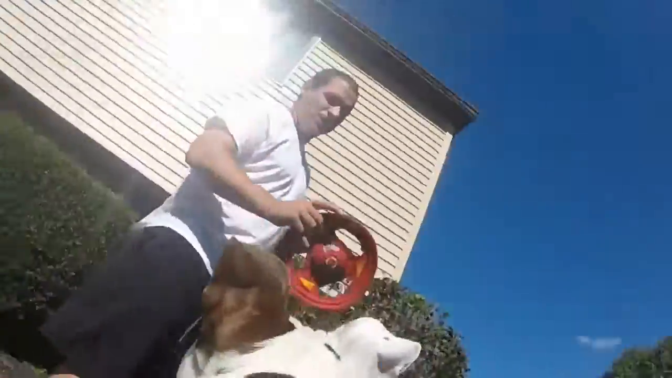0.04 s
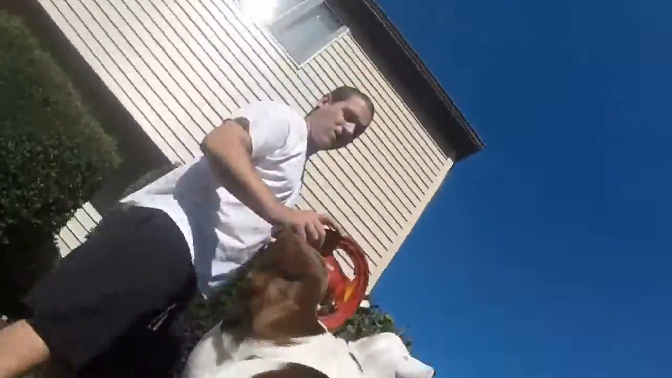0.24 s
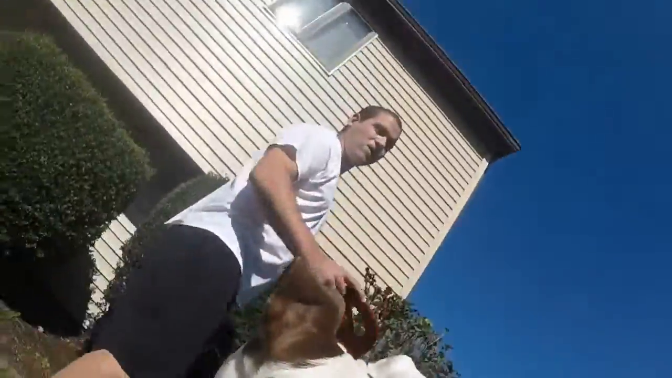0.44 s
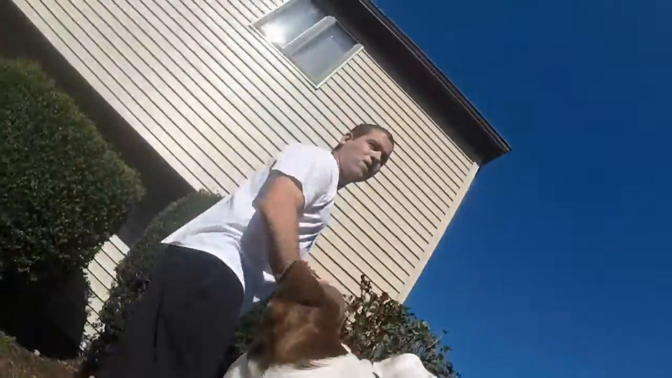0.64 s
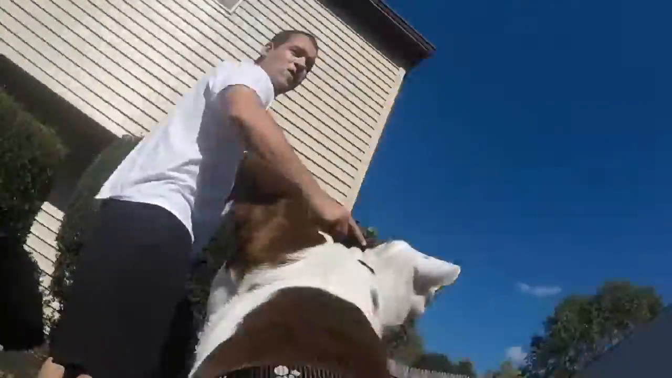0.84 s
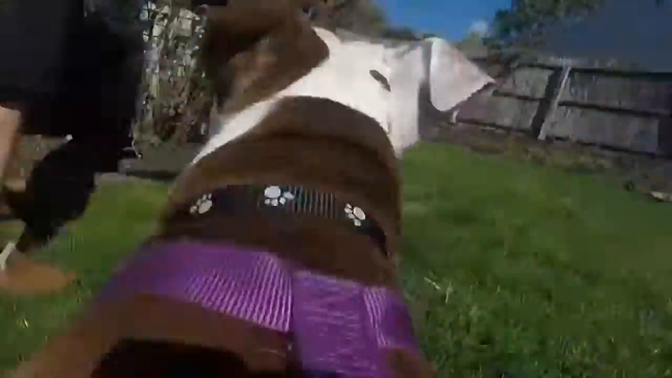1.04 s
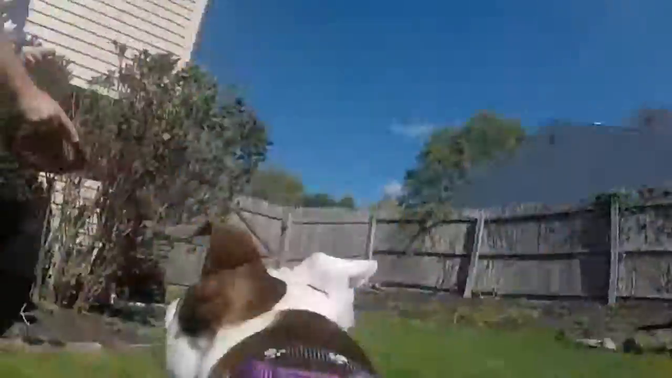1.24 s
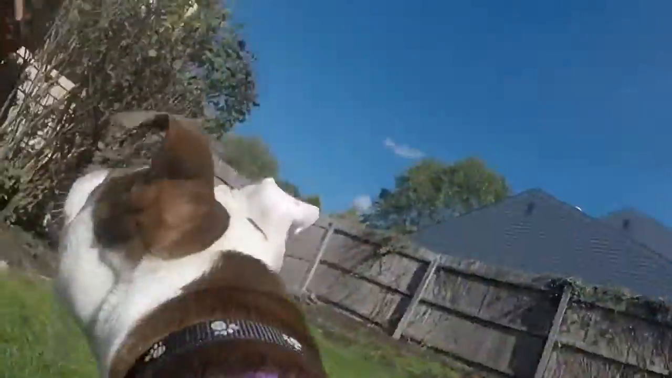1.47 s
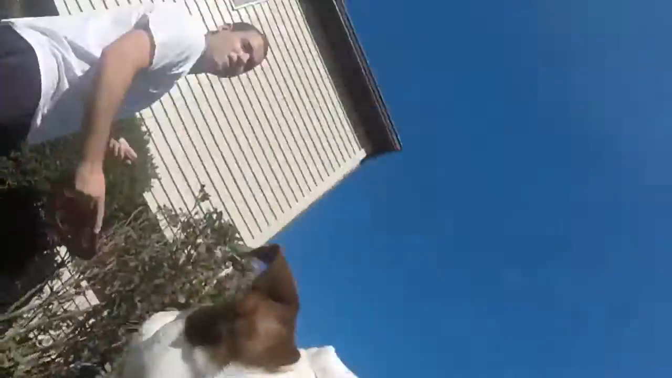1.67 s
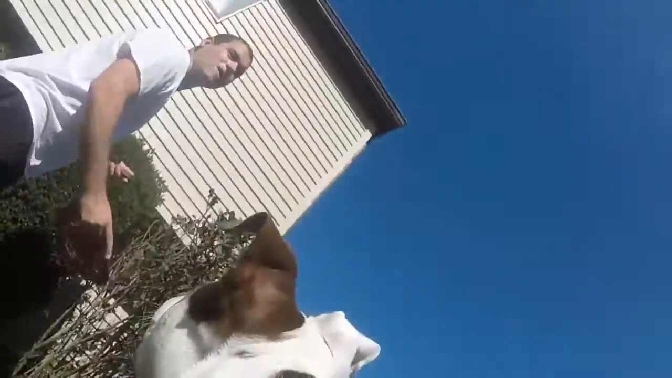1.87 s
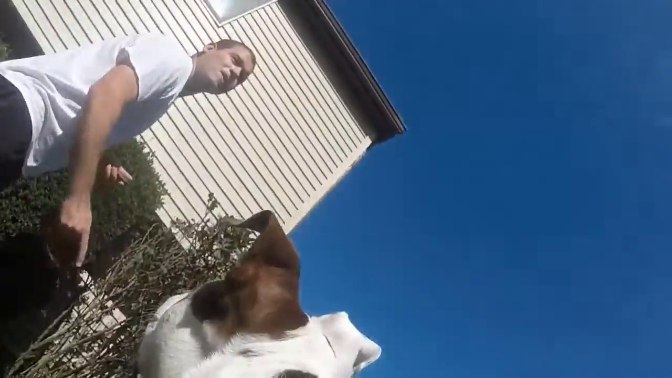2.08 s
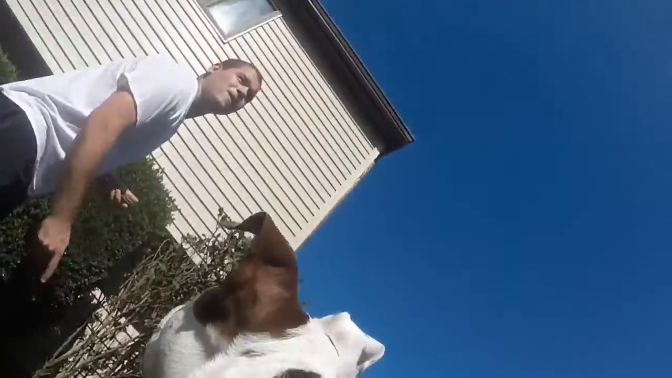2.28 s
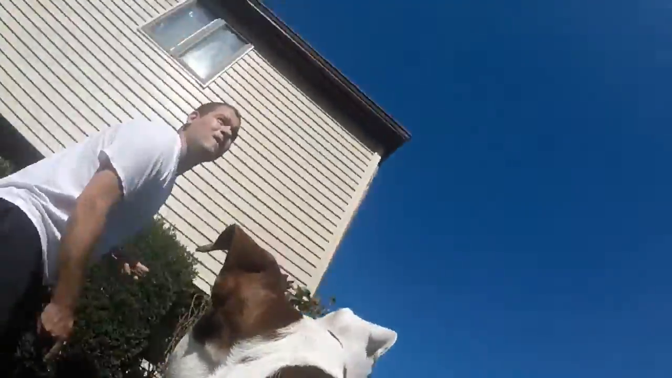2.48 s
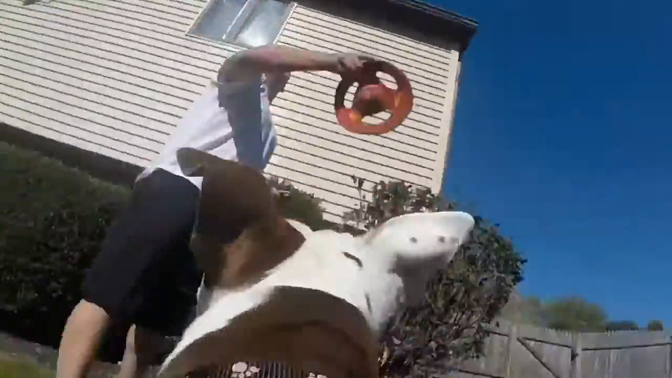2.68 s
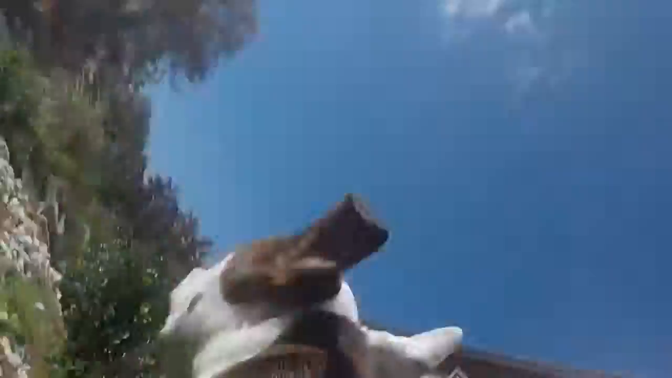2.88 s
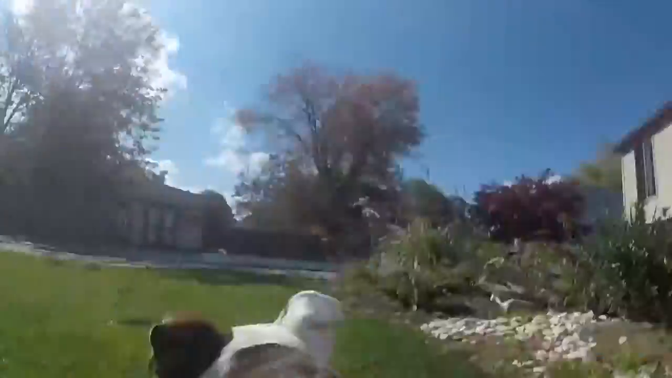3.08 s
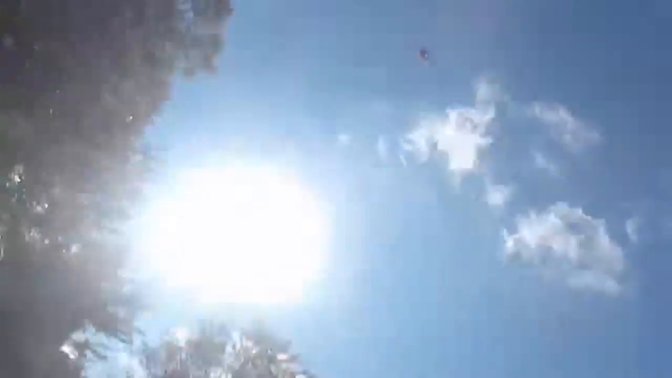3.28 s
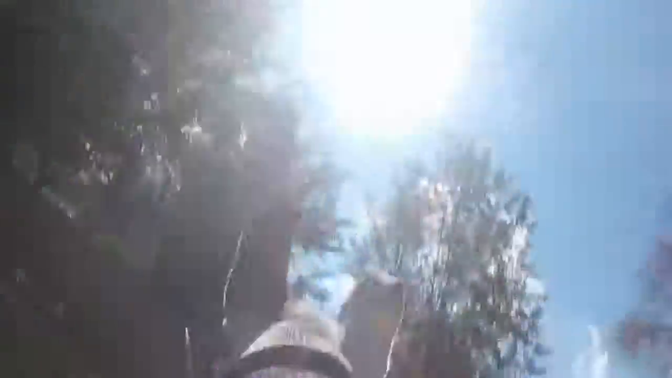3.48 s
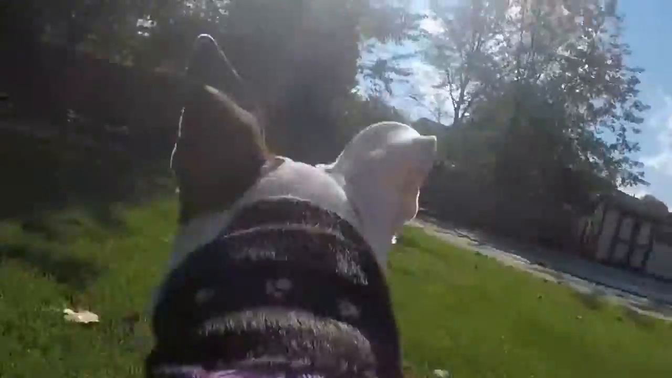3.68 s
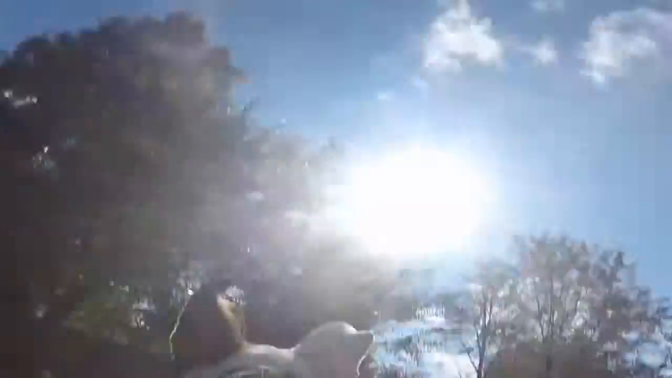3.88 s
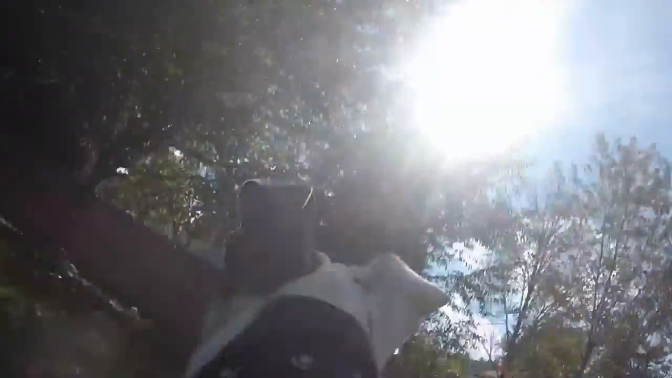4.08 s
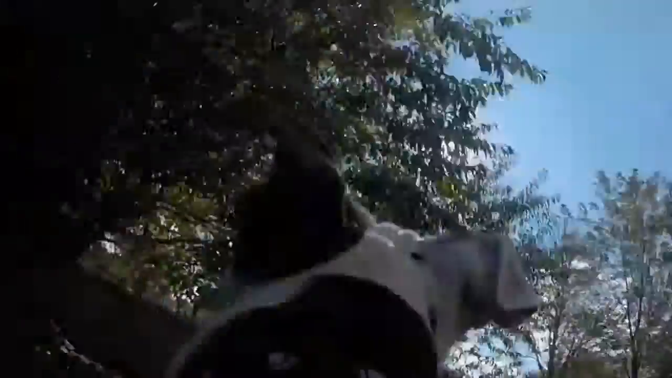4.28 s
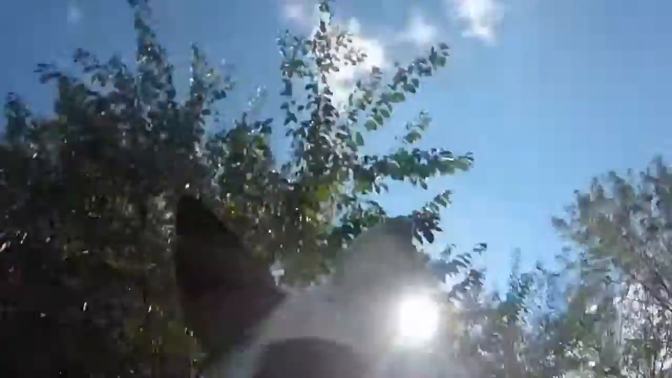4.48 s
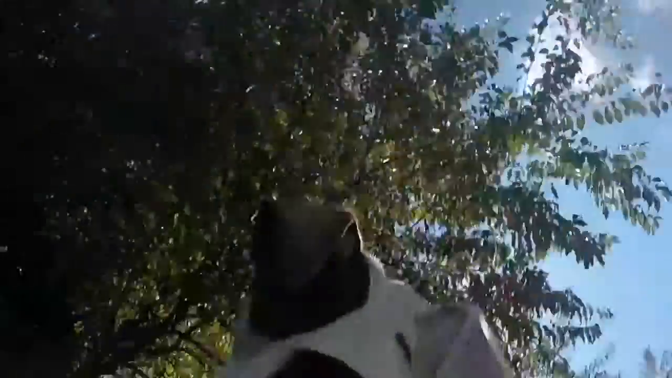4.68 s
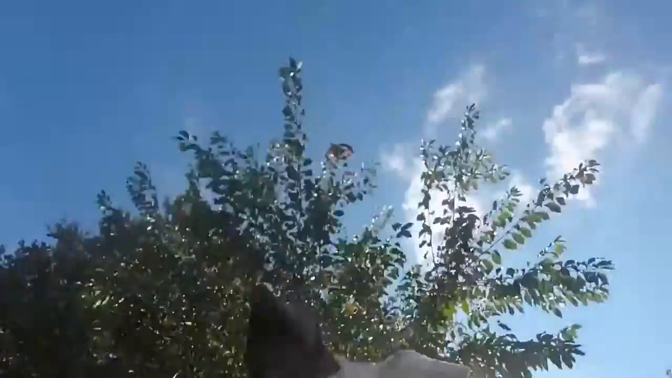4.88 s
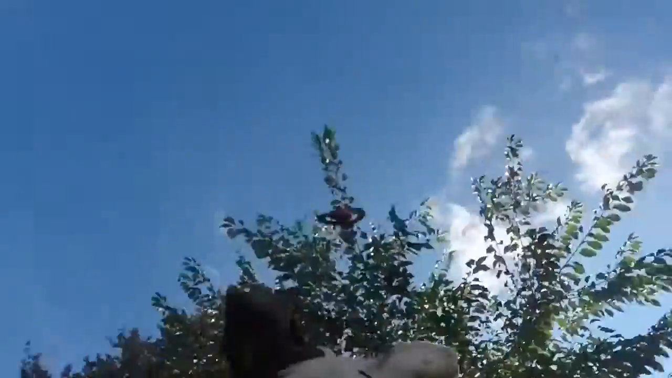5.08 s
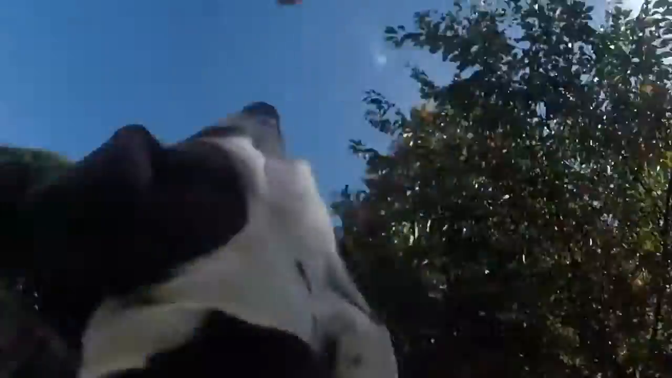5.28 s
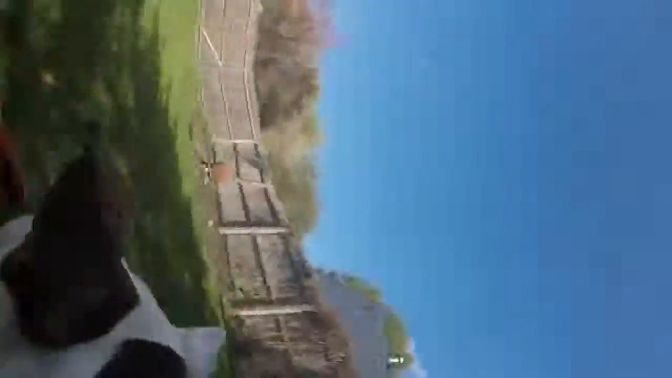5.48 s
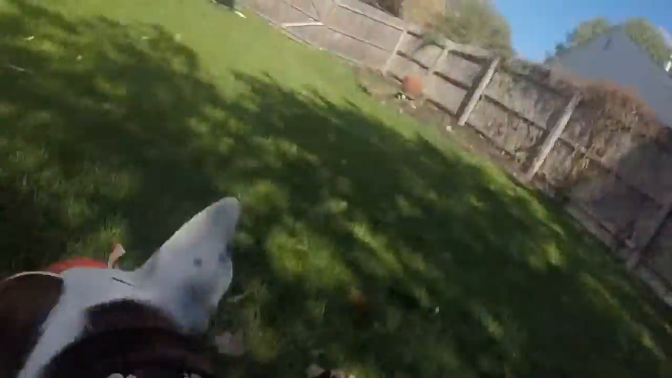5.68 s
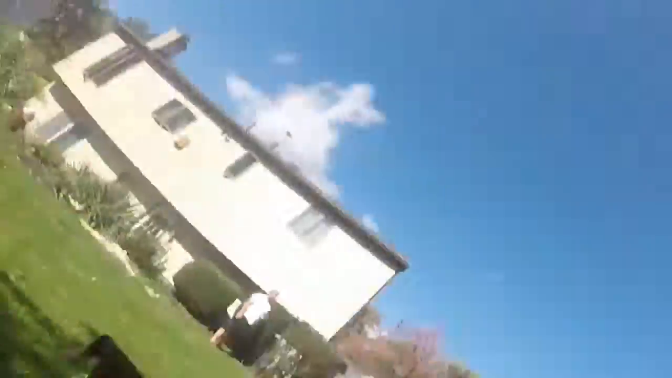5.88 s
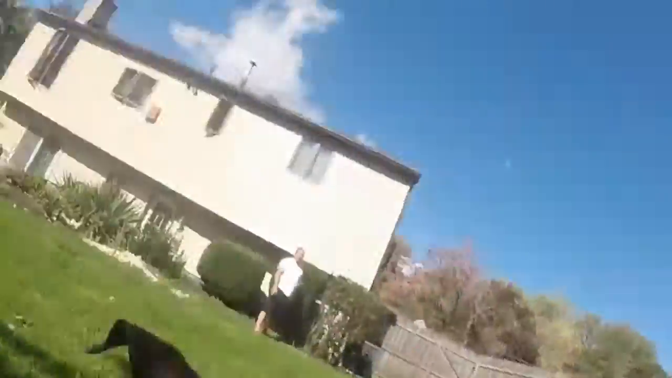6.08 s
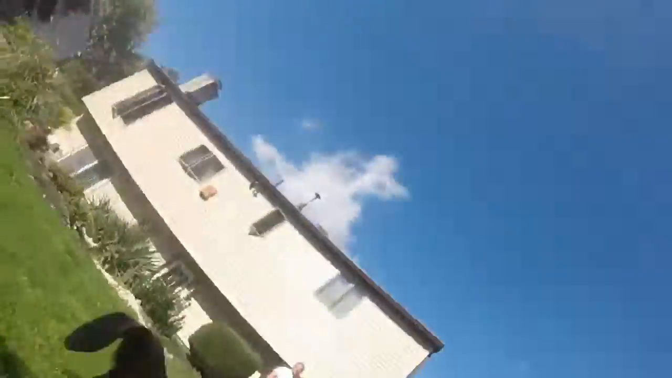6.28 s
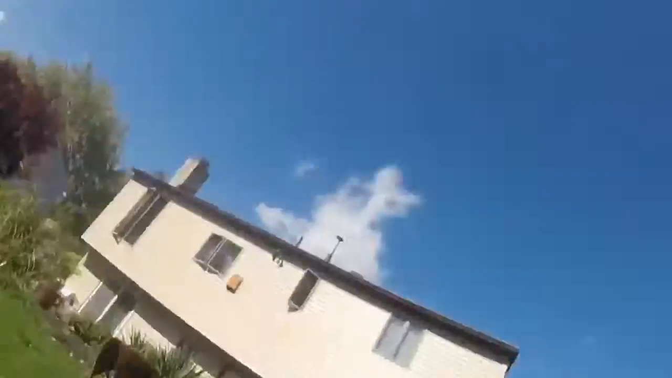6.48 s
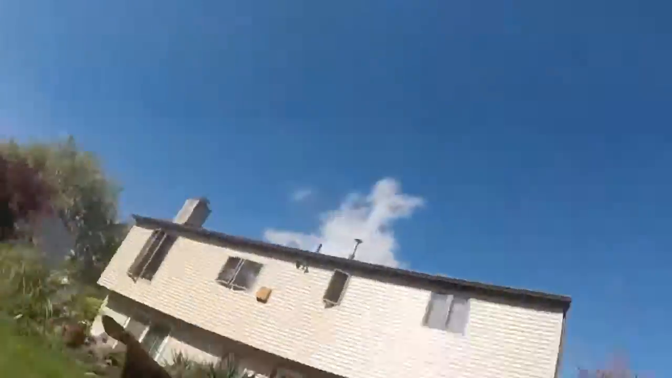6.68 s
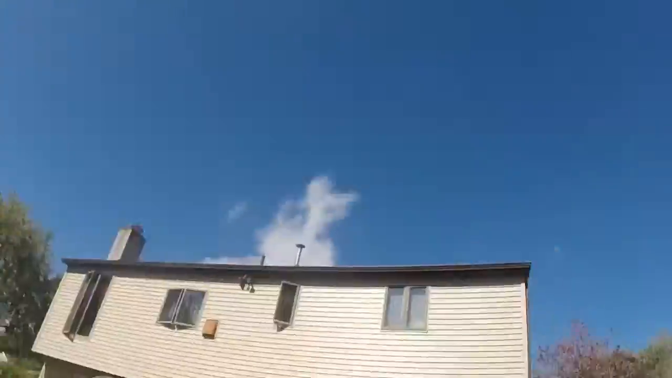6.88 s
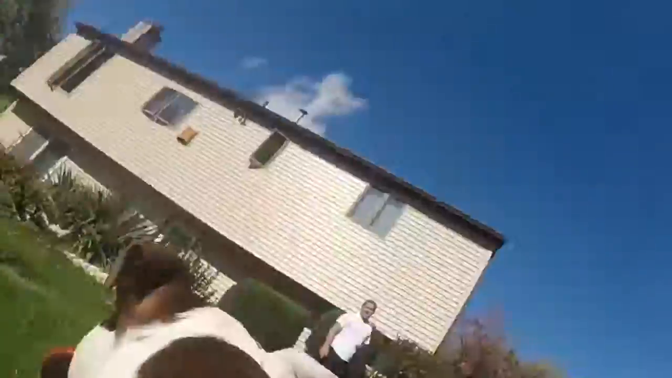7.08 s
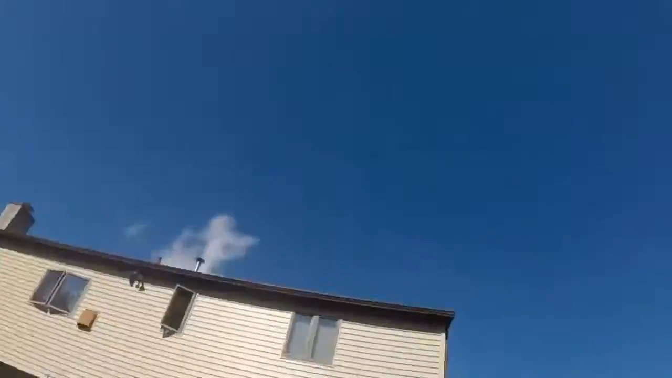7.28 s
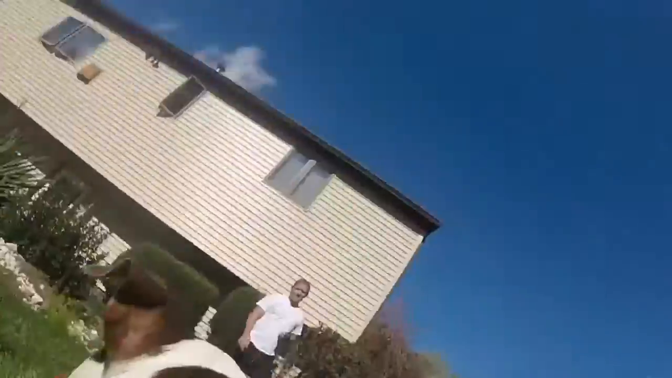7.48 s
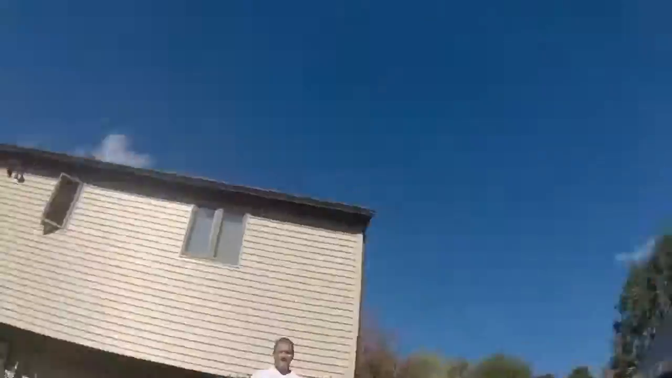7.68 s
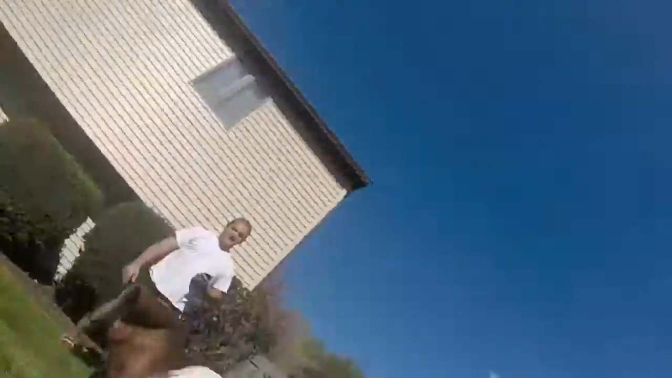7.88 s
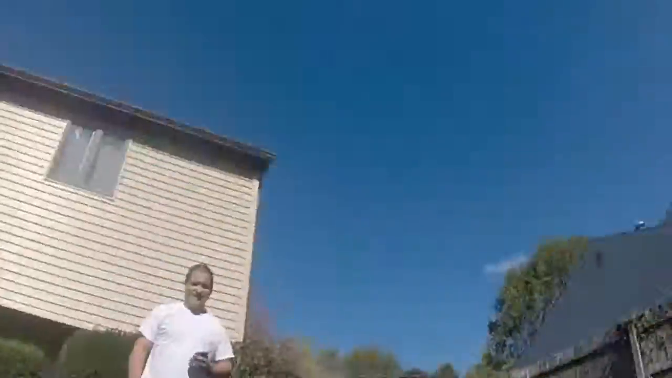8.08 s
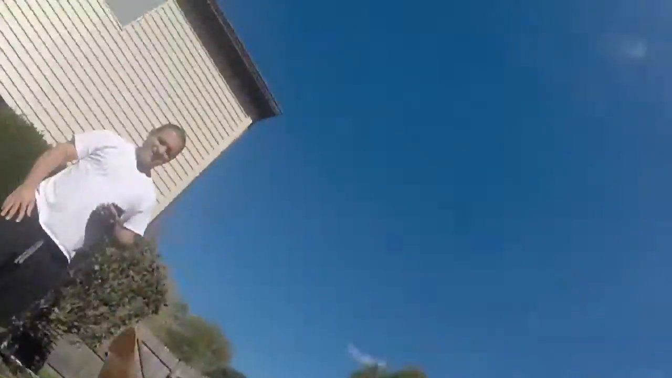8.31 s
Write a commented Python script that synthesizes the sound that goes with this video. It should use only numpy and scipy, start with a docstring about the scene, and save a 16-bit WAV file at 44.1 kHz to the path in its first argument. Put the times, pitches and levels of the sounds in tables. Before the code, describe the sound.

Hard plastic knocks, rattling fittings and jingling collar metal right at the microphone as a dog bolts across a yard, wind gusting low.

```python
"""On a lawn outdoors, heard by the microphone of a camera strapped to a dog's back: nothing but the yard is distant.
The dog waits with a few knocks over wind, a soft murmur, a faint hum and a far insect's trill; then it bolts after
a toy, gusts rise, the loose mount knocks and chatters on the housing, straps rustle and collar metal pings and rings.
It trots back, still knocking. Contacts are noise bursts through housing resonances, metal is decaying sines, air is
shaped noise; the camera's limiter ducks everything after hard knocks."""
import sys
import numpy as np
from scipy import signal
from scipy.fft import rfft, irfft, next_fast_len
from scipy.io import wavfile
from scipy.ndimage import uniform_filter1d, minimum_filter1d

SR = 44100
rng = np.random.default_rng(int(sys.argv[2]) if len(sys.argv) > 2 else 0)


def master(y):
    """Save y as 16-bit WAV."""
    cut = np.clip(np.atleast_2d(y).T, -1, 1)
    pcm = np.round(cut * 32767)  # scale
    wavfile.write(sys.argv[1], SR, pcm.astype(np.int16))


N = 368185
TIME = np.arange(N) / SR
HOLLOW_HZ, MIDDLE_HZ, BRIGHT_HZ = 1450, 3000, 6600  # upper edges of the lower three registers


def undb(db):
    """Decibels to gain."""
    return 10 ** (np.asarray(db) / 20)


def unit(x):
    """Scale to rms 1."""
    return x / (np.sqrt(np.mean(x ** 2)) + 1e-12)


def add(out, s, x):
    """Mix x into out from time s on."""
    i = max(int(s * SR), 0)
    out[i:i + len(x)] += x[:max(N - i, 0)]


def follow(points):
    """Level [dB] over time, in straight lines between (time, level) points."""
    return np.interp(TIME, *np.transpose(points))


def band(x, hz, kind, order=3):
    """Causal Butterworth filter."""
    return signal.sosfilt(signal.butter(order, hz, kind, fs=SR, output="sos"), x)


def resonate(x, hz, width_hz):
    """One resonance of the given bandwidth."""
    return signal.lfilter(*signal.iirpeak(hz, hz / width_hz, fs=SR), x)


def walk(rate):
    """Smooth random wander with a spread near 1, taking a new value `rate` times a second."""
    steps = rng.standard_normal(N // 100)
    return 1.2 * np.interp(TIME * rate, np.arange(len(steps)), steps)


def coloured(points):
    """Noise of rms 1 with a spectrum of (Hz, dB) points."""
    hz, db = np.transpose(points)
    size = next_fast_len(N, real=True)
    f = np.maximum(np.fft.rfftfreq(size, 1 / SR), 1)
    spectrum = rfft(rng.standard_normal(size)) * undb(np.interp(np.log(f), np.log(hz), db))
    return unit(irfft(spectrum, size)[:N])


def mode(hz, t60):
    """One struck mode: a decaying sine that starts at rms 1."""
    t = TIME[:int(t60 * SR)]
    return np.sqrt(2) * np.sin(2 * np.pi * hz * t) * np.exp(-np.log(1000) * t / t60)


def grains(spread_db, count):
    """Random tiny contacts, most weak and a few strong."""
    out = np.zeros(N)
    size = undb(spread_db * np.minimum(rng.exponential(size=count), 3))
    out[rng.integers(0, N, count)] = size * rng.choice([-1, 1], count)
    return out


def registers(x):
    """Split into hollow, middle, bright and tick bands."""
    hollow = band(x, HOLLOW_HZ, "low", order=5)
    middle = band(x, [HOLLOW_HZ, MIDDLE_HZ], "band", order=4)
    bright = band(x, [MIDDLE_HZ, BRIGHT_HZ], "band", order=4)
    tick = band(x, BRIGHT_HZ, "high", order=8)
    return [hollow, middle, bright, tick]


# Resonances of the plastic camera housing: (frequency [Hz], width [Hz], level [dB])
HOUSING_MODES = [(800, 33, 0), (955, 120, 7), (1164, 217, 5), (2063, 310, 4.5), (2306, 57, -0.5),
                 (2566, 190, -2), (3335, 264, -3), (3707, 310, -9.5), (4345, 254, -1.5), (5290, 830, -10),
                 (6280, 320, -2), (9070, 530, -14.5), (10060, 370, -14.5), (14100, 1000, -11.5)]


def housing(force, vary_db=0, lowest_hz=560, highest_hz=11400):
    """The case rings in short modes, each as strongly as the contact point allows; it is too small to give bass."""
    out = 0
    for hz, width_hz, db in HOUSING_MODES:
        place = undb(db + vary_db * rng.standard_normal(force.shape[:-1] + (1,)))
        out = out + place * resonate(force, hz, width_hz)
    return band(band(out, lowest_hz, "high", order=3), highest_hz, "low", order=6)


def roaming(force, roam_db, shift_rate_hz=70, lowest_hz=590, highest_hz=11000):
    """Small contacts land all over the case, so each one favours other modes and has its own colour."""
    out = 0
    for hz, width_hz, db in HOUSING_MODES:
        place = undb(db + roam_db * np.clip(walk(shift_rate_hz), -2, 2))
        out = out + resonate(force * place, hz, width_hz)
    return band(band(out, lowest_hz, "high", order=3), highest_hz, "low", order=4)


# Knocks of the mount, right at the microphone: (time [s], level [dB],
# hollowness of the lows against the middle [dB], hardness of the treble against the middle [dB])
KNOCKS = [(0.2838,-40,4,3),(.9989,-31,2,-1),(1.0841,-23,8.5,13),(1.1216,-29.5,0,-10),(1.148,-14,-0.5,11),(1.1558,-8,-8,8.5),(1.2698,-27.5,3.5,-3),(1.2826,-17.5,-2,2.5),(1.3003,0.5,-5,13.5),(1.371,-33,-3,2),(1.429,-18.5,-3,5),(1.453,-7.5,-2.5,23),(1.462,-17.5,0.5,21),(1.5926,-34,-9,17),(1.7118,-25.5,-2,-2.5),(1.7669,-16.5,3,19.5),(1.828,-42.5,-14,-8.5),
          (2.697,-28.5,7,7.5),(2.711,-18.5,-3,-2.5),(2.7616,-2.5,-6.5,6),(2.779,-2,-7,9.5),(2.817,-14.5,-4,14),(2.998,-12.5,5,13),(3.0186,-16.5,-3,24),(3.0846,-2,-13.5,-3),(3.1945,-11.5,-4.5,-3),(3.2163,-6.5,-9,-3.5),(3.2344,-18,15,1),(3.3053,-14.5,4,-13),(3.3238,-7.5,-22,-6),(3.3302,-14.5,10,2),(3.343,-12.5,-1,1),(3.3676,-5.5,3.5,8),(3.4389,-2.5,-36,-21),(3.4699,-5.5,-8,6.5),(3.4787,-8,-18,4),(3.503,2,-24,6),(3.5172,-1,-11.5,-4.5),(3.576,1.5,0,13),(3.6061,-12,-4,6),(3.685,-15,-4.5,-7.5),
          (3.8059,-7.5,-5,5),(3.848,-6,-5.5,7.5),(3.8536,-9,-16,8),(3.8761,-3.5,-9.5,2.5),(3.916,-5,-6.5,-5),(3.9417,6.5,-9,3.5),(3.9503,3.5,7.5,9),(3.961,3.5,-7,4),(4.0262,-16,10,-4),(4.0738,1,-10,10),(4.0837,9.5,-2,0.5),(4.09,8.5,-16,2.5),(4.155,-1.5,-9,0),(4.1836,-13,-3,9),(4.256,1.5,11.5,10),(4.2611,4.5,9.5,9.5),(4.288,9,2.5,10.5),(4.2979,-2.5,1,-3),(4.3065,-5.5,2,4),(4.3824,-8.5,7,-3.5),(4.442,-11,-6,12),(4.4827,-7.5,-12,11),(4.581,-14.5,-18,-14),(4.5973,6.5,3.5,-10.5),(4.6244,-7.5,0,-2),(4.6644,-10.5,-11,-6),(4.776,-2.5,-2,4.5),(4.879,-17.5,13,5),
          (5.229,-20,10.5,11),(5.2897,-9,8,6.5),(5.322,-15,-2,-2),(5.4001,-9.5,-2.5,-3.5),(5.419,-14,-7,-6),(5.438,-12,0.5,3.5),(5.512,-20,8,12.5),(5.5455,-8,0,0),(5.5977,-14.5,11,6.5),(5.6505,-17.5,-6,4),(5.7213,-17.5,-14,0),(5.747,-19,-5,-11),(5.7551,-6.5,-21,-2.5),(5.7962,1.5,9,18),(5.8979,5.5,2.5,24),(5.9231,-6,1.5,1),(5.9342,-11.5,-8,14),(6.092,-17,2.5,11),(6.2219,-8.5,-21,2.5),(6.284,-1.5,-7.5,-0.5),(6.3238,-19,16,8),(6.361,5,-10,-4.5),(6.557,-19,-8.5,5),(6.5703,-20,17,13.5),(6.7392,-14,-1,0.5),(6.839,-12,25,6),(6.879,-10.5,4,-1),(6.9178,-24,14,-2),(6.9861,-19.5,6,1),(7.025,-22,1,-14),
          (7.0722,-6,-0.5,-7),(7.0977,-7,-1.5,7.5),(7.2715,-16.5,10,2),(7.2903,-2.5,-11,14),(7.306,-5.5,1.5,14),(7.3215,-9,-9,12),(7.408,5,9.5,12),(7.4293,-8.5,18,1),(7.4439,-7,5,9),(7.5224,2.5,4.5,18.5),(7.5809,-12.5,-1.5,-2),(7.6806,-5,-3.5,13),(7.8637,-11.5,13,-3),(7.945,-12.5,-14,4),(8.0664,-19,4,2),(8.1082,-22,15,-1),(8.1385,-7.5,0,7.5),(8.1701,-4,1,3),(8.1917,-6.5,-6,10),(8.252,-6.5,-14,-5),(8.305,-22,13,4),(8.3378,-24,-7,1)]


def knocks(snap=1.0, buzz_s=0.0016, tail_db=-29, tail_s=0.0082, clack_hz=3730, clack_width_hz=260, clack_db=-7,
           tick_under_db=-7, tick_share=0.77):
    """Each knock is a hard contact and a brief buzz of tiny rebounds; where it lands sets its colour."""
    t = TIME[:SR // 25]
    rebounds = np.exp(-(t / buzz_s) ** 0.79) + undb(tail_db) * np.exp(-t / tail_s)
    force = rng.standard_normal((len(KNOCKS), len(t))) * rebounds
    force[:, 0] += snap
    parts = np.stack(registers(housing(force, vary_db=4.0)), axis=1)
    # the harder the knock, the more one stiff mode of the case carries it: a sharp clack
    clack = resonate(parts[:, 2], clack_hz, clack_width_hz)
    parts[:, 2] += undb(np.array(KNOCKS)[:, 3:4] + clack_db) * clack
    # levels are those of the first 5 ms
    parts /= np.sqrt(np.mean(parts[:, :, :SR // 200] ** 2, axis=2, keepdims=True))
    out = np.zeros(N)
    for (s, db, hollow, hard), part in zip(KNOCKS, parts):
        # the topmost tick lies lower and follows only a share of the hardness
        weights = undb([hollow, 0, hard, tick_share * hard + tick_under_db])
        add(out, s, undb(db) * weights @ part / np.linalg.norm(weights))
    return out


# Spells of fine chatter at the mount, levels before each layer's own gain:
# (time [s], length [s], level [dB], shimmer of the small ring [dB])
RATTLES = [(0.065,.12,-42.5,-70),(0.933,0.11,-32,-66),(1.096,0.079,-30.5,-68),(1.422,0.04,-25.5,-69.5),(1.57,0.04,-41.5,-75),(1.682,.043,-33.5,-72.5),(2.606,0.055,-45.5,-72),(2.698,0.044,-31.5,-66),(2.758,0.08,-22.5,-60),(2.985,0.046,-19.5,-59),(3.187,0.073,-18,-36),(3.292,0.099,-15,-36),(3.462,0.044,-20,-48),(3.686,.094,-37,-42),(3.804,0.22,-26,-64),(4.074,0.049,-13.5,-21),(4.193,0.026,-21,-36),(4.266,0.053,-8.5,-49),(4.383,0.11,-27,-51),(4.594,0.041,-8.5,-57),(4.88,0.043,-15.5,-38),(4.951,0.077,-15.5,-26),(5.12,0.14,-53,-43),(5.273,0.19,-23,-44.5),(5.507,0.2,-28,-49),(5.71,0.071,-20,-54),(5.901,0.055,-15,-42),(6.12,0.032,-19,-46.5),(6.2,0.025,-17.5,-50),(6.276,0.067,-25.5,-38),(6.544,0.041,-29,-49),(6.734,.042,-19,-43),(6.843,0.13,-27.5,-26),(7.07,0.073,-19.5,-27),(7.212,0.093,-39.5,-43),(7.28,0.058,-15.5,-40),(7.407,0.058,-15,-45),(7.478,0.06,-18.5,-57),(7.668,0.028,-15,-39),(7.696,0.081,-25.5,-62),(7.846,0.12,-16,-51),(8.03,0.093,-32.5,-64),(8.162,0.043,-15,-46),(8.313,.04,-26.5,-54)]


def spells(gains, release_s=0.0039):
    """Envelope that holds one gain through each spell of chatter and dies away after it."""
    out = np.zeros(N)
    for (s, length, *_), gain in zip(RATTLES, gains):
        add(out, s, np.full(int(length * SR), gain))
    keep = np.exp(-1 / (release_s * SR))
    return signal.lfilter([1 - keep], [1, -keep], out)


def chatter(gain_db=-3.5, hollow_db=-3, bright_db=-2, tick_db=-14, surge_db=3):
    """Sliding parts catch and slip many times in uneven surges, rattling the housing."""
    contacts = roaming(grains(2.85, count=7000), roam_db=4.5)
    low, middle, bright, tick = (unit(x) for x in registers(contacts))
    body = unit(middle + undb(bright_db) * bright)
    rattle = unit(undb(hollow_db) * low + body + undb(tick_db) * tick)
    return rattle * spells(undb(np.array(RATTLES)[:, 2] + gain_db)) * undb(surge_db * walk(90))


# Clear blows on the small metal ring close by, before gain: (time [s], level [dB], brightness [dB])
PINGS = [(3.198,-22,-12),(3.223,-26,-8),(3.254,-34,4),(3.35,-16,2.5),(3.393,-22,-9.5),(3.414,-34,10),(3.439,-27.5,-1),(3.502,-14,-37),(3.723,-30,-20),(4.028,-26.5,-12),(4.201,-48,17),(4.425,-46,11),(4.623,-10.5,-8),(4.648,-15.5,-26),(4.857,-28.5,-13),(4.897,-21.5,-4),(4.963,-23,-3),(4.995,-2,-17),(5.014,-14.5,-12),(5.038,-27,-22),(5.177,-33,-10),(5.289,-31,-4),(5.362,-27,11.5),(5.412,-24,-3),(5.437,-13,-7.5),(5.519,-26.5,-7),(5.567,-26,-15),(5.595,-28.5,3),(5.652,-24.5,-5.5),(6.29,-28.5,-8),(6.765,-20,-4),(6.758,-15.5,-7.5),(6.851,-20,-31),(6.88,-13,-7),(6.94,-25,3),(7.004,-30,-18),(7.044,-32,-22),(7.099,-15.5,-5.5),(7.145,-26,-20),(7.271,-22,-14),(7.522,-1.5,-17),(7.679,-27.5,1),(7.867,-21.5,-8),(7.946,-9.5,-9)]
# Modes of the free ring: (frequency [Hz], level [dB], t60 [s], index of the group whose strength it shares)
RING_MODES = [(5060, 0, .14, 0), (5700, -4, .11, 0), (6325, -5, .055, 1), (6400, -5, .045, 1),
              (7878, -2, .13, 2), (11240, -2, .11, 3), (12642, -1, .1, 4), (12690, -5, .07, 4),
              (13610, -1, .07, 4), (15240, -5, .08, 4)]
# How a blow reaches the mode groups near 5, 6.4, 7.9, 11.2 and 13 kHz:
# (level [dB], share of the brightness that it follows)
RING_GROUPS = [(-17.5, 1), (1, 0.0048), (-9, 0.35), (0.5, 1), (-7, 1)]


def small_ring(gain_db=5.0, vary_db=2.5, detune=.0022, grip=0.079, clink_db=-3, clink_t60=0.054, clink_spread=0.04):
    """The ring sounds a different mix of its modes at each blow; the strap damps it, now tighter, now looser."""
    out = np.zeros(N)
    chance = rng.standard_normal((len(PINGS), len(RING_MODES), 4))
    for (s, level_db, bright_db), draws in zip(PINGS, chance):
        for k, ((hz, db, t60, group), (bend, slack, load, place)) in enumerate(zip(RING_MODES, draws)):
            group_db, share = RING_GROUPS[group]
            blow_db = level_db + group_db + share * bright_db
            gain = (-1) ** k * undb(blow_db + vary_db * place + db + gain_db)
            add(out, s, gain * mode(hz * (1 + detune * bend), t60 * np.exp(grip * slack)))
            # while the two metal parts still touch, the mode is pulled off pitch and dies quickly
            add(out, s, gain * undb(clink_db) * mode(hz * (1 + clink_spread * load), clink_t60))
    return out


# The small ring swings freely from the leap until the dog slows down: (start [s], end [s])
JINGLE_S = (3.18, 8)


def shimmer(gain_db=-8, low_modes_db=-5, swing_db=-30, scrape_db=-7, scrape_hz=8000, pressed=.5):
    """Chatter and the swing of the run tap the ring, mostly its high modes; pressed on its clasp it rings shorter."""
    swinging = (TIME > JINGLE_S[0]) & (TIME < JINGLE_S[1])
    effort = spells(undb(np.array(RATTLES)[:, 3] + gain_db))
    effort = effort + swinging * undb(follow(RUSTLE) + swing_db)
    # metal sliding on metal adds a fine, very high crackle
    scrape = unit(band(grains(6, count=2500), scrape_hz, "high", order=2))
    out = undb(scrape_db) * effort * scrape
    for hz, db, t60, _ in RING_MODES:
        ring = mode(hz, t60 * pressed)  # the share of its free ring time that it keeps
        gain = undb(db + low_modes_db * (hz < BRIGHT_HZ)) / np.linalg.norm(ring)
        taps = unit(grains(5.4, count=1000)) * effort
        out += gain * signal.oaconvolve(taps, ring)[:N]
    return out


# Blows that leave the heavy buckle ringing close by, before gain: (time [s], level [dB])
BUCKLE = [(1.1548, -34.5), (1.3004, -36.5), (3.0846, -36), (3.5017, -16.5), (3.9612, -25.5), (4.091, -14.5),
          (4.289, -12.5), (4.5983, -12), (4.777, -29.5), (5.7966, -29), (6.3613, -18.5), (7.0712, -31),
          (7.4096, -23), (8.1925, -34), (8.2524, -32.5)]
# Modes of the buckle: (frequency [Hz], level [dB], t60 [s])
BUCKLE_MODES = [(712, -3, 0.087), (1810, -1.5, 0.3), (2900, -6.5, 0.15), (5000, -20.5, .05)]


def buckle(gain_db=1.0, choke_s=0.018):
    """The heavier metal rings on after hard knocks, until the next such blow stops it."""
    out = np.zeros(N)
    ends = [s for s, _ in BUCKLE[1:]] + [N / SR]
    for (s, level_db), end in zip(BUCKLE, ends):
        for hz, db, t60 in BUCKLE_MODES:
            ring = mode(hz, t60)
            free = np.exp(-np.maximum(s + TIME[:len(ring)] - end, 0) / choke_s)
            add(out, s, undb(level_db + db + gain_db) * ring * free)
    return out


# Dull bumps of the camera on the dog's back, before gain: (time [s], level [dB])
BUMPS = [(3.327, -18.5), (3.935, -13.5), (4.073, -12), (4.082, 6), (4.289, -8.5), (5.458, -24),
         (7.522, -14)]


def bumps(top_hz=170, decay_s=0.0089, gain_db=-1):
    """Soft contact with the body passes mostly the bass."""
    out, t = np.zeros(N), TIME[:SR // 10]
    for s, db in BUMPS:
        thud = unit(band(rng.standard_normal(len(t)), [55, top_hz], "band", order=1))
        add(out, s, undb(db + gain_db) * thud * np.exp(-t / decay_s))
    return out


# Rubbing of the straps beside the camera as the dog moves, before each layer's gain: (time [s], level [dB])
RUSTLE = [(0.1, -49), (0.5, -52), (0.8, -54), (1.05, -42.5), (1.55, -46.5), (1.95, -68), (2.5, -58),
          (2.85, -33), (3.3, -27.5), (3.65, -33), (4.3, -28.5), (4.7, -26.5), (5.1, -36), (5.55, -37.5),
          (6.1, -35), (6.55, -44.5), (7.2, -32), (8.25, -41)]


def straps(tick_db=-2, rub_db=-4, flutter_db=4, still_db=-62, muffled_db=-12, muffled_hz=380, slack_db=-6,
           pull_s=0.091):
    """Webbing rubs on fur, dull through the case, and fittings tick; it pulls around chatter, slack between."""
    pulled = np.clip(2 * uniform_filter1d(spells(np.ones(len(RATTLES))), int(pull_s * SR)), 0, 1)
    rustle = np.maximum(undb(follow(RUSTLE)) - undb(still_db), 0)  # silent when nearly still
    ticks = unit(roaming(grains(8, count=700), roam_db=6.5)) * undb(tick_db)
    rub = unit(roaming(grains(2.5, count=9000), roam_db=3.5)) * undb(rub_db + flutter_db * walk(35))
    muffled = unit(band(rng.standard_normal(N), [muffled_hz / 1.28, muffled_hz * 1.57], "band", order=2))
    muffled = muffled * undb(muffled_db + 4.5 * walk(25))
    return rustle * undb(slack_db * (1 - pulled)) * (ticks + rub + muffled)


# Spectrum of the wind on the case: (frequency [Hz], relative level [dB per Hz])
WIND = [(20, -1.5), (35, -1.5), (60, -1.5), (100, -5.5), (150, -12), (220, -16), (400, -54), (900, -85.5)]
# Wind on the case, strongest as the dog bolts, before gain: (time [s], level [dB])
GUSTS = [(0, -45), (0.8, -41), (1.15, -39.5), (1.5, -52.5), (2.2, -46), (2.65, -44.5), (2.9, -27),
         (3.3, -28), (3.55, -42.5), (3.73, -25.5), (3.98, -39), (4.35, -33), (4.65, -41.5), (5.15, -44.5),
         (5.5, -39), (6, -48), (6.6, -44.5), (7.25, -37.5), (8.3, -42.5)]


def wind(gain_db=-1, gust_db=2):
    """Air buffets the case: low rumbling noise that rises and falls in gusts."""
    return coloured(WIND) * undb(follow(GUSTS) + gain_db + gust_db * walk(14))


# Spectrum of the open yard all around: (frequency [Hz], relative level [dB per Hz])
YARD = [(60, 2.5), (120, -2.5), (200, 0.5), (290, -3), (400, -3), (600, -6), (900, -0.5), (1150, -5.5),
        (1500, -18.5), (2200, -23), (5000, -30), (7500, -34), (14000, -47.5)]


def yard(level_db=-44.5, swell_db=2.1):
    """The outdoor murmur is shaped noise that swells a little around one level."""
    return coloured(YARD) * undb(level_db + swell_db * walk(8.5))


# Partials of a faint hum in the background: (frequency [Hz], level [dB])
HUM = [(95, -49.5), (190, -55), (285, -54)]


def hum():
    """Three harmonic sines waver slightly together in pitch and separately in level."""
    turns = np.cumsum(1 + 0.01185 * walk(15)) / SR
    return sum(undb(db + 2 * walk(12)) * np.sin(2 * np.pi * hz * turns) for hz, db in HUM)


# A far insect trills: (start [s], end [s])
TRILLS = [(.45, .8), (1.92, 2), (2.35, 2.5)]


def insect(hz=5270, width_hz=130, rate_hz=17, level_db=-70):
    """A thin pulsing trill from far off: narrow noise swelling at the pulse rate."""
    singing = 1. * sum((TIME > start) & (TIME < end) for start, end in TRILLS)
    tone = unit(resonate(rng.standard_normal(N), hz, width_hz))
    pulses = np.abs(np.sin(np.pi * rate_hz * TIME))
    return undb(level_db) * tone * uniform_filter1d(singing, SR // 20) * pulses


def scene():
    """Hardware, straps and bumps on or next to the camera, over the open air, with no room around it."""
    hardware = knocks() + chatter() + small_ring() + shimmer() + buckle()
    background = wind() + yard() + hum() + insect()
    return (hardware + bumps() + straps() + background)[None]


def limiter(x, limit_db=-11, ratio=8.95, recover_db_per_s=14.5):
    """A loud knock turns the gain down at once; it then creeps back at a steady rate."""
    level_db = 10 * np.log10(np.abs(uniform_filter1d(x[0] ** 2, SR // 200)) + 1e-12)
    over_db = np.maximum(level_db - limit_db, 0) * (1 - 1 / ratio)
    recovered_db = recover_db_per_s * TIME
    cut_db = np.maximum.accumulate(over_db + recovered_db) - recovered_db
    gain = minimum_filter1d(undb(-cut_db), SR // 200)
    return x * uniform_filter1d(gain, SR // 1000)


def record(dry, top_hz=15500):
    """The limiter ducks everything after the loudest knocks, whose peaks are still rounded; the top is cut."""
    held = limiter(dry)
    rounded = held / (1 + (held / .95) ** 4) ** .25
    return signal.sosfilt(signal.ellip(8, .2, 70, top_hz, fs=SR, output="sos"), rounded)


dry = scene()
out = record(dry)
master(out)
```